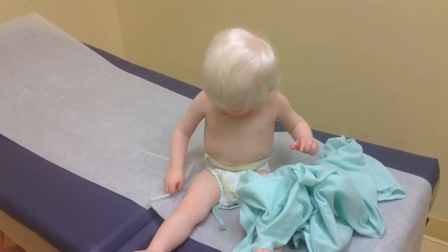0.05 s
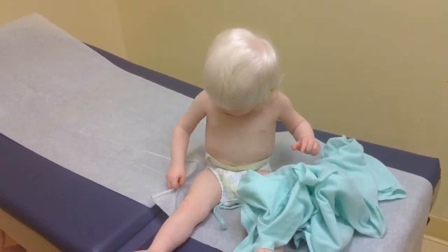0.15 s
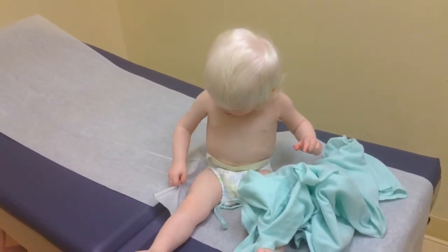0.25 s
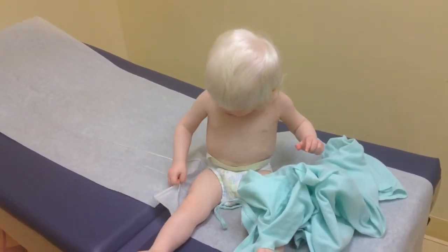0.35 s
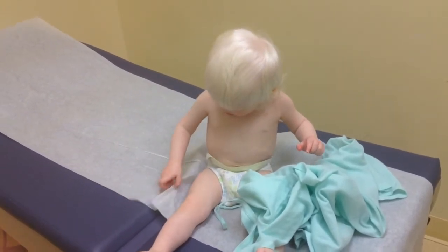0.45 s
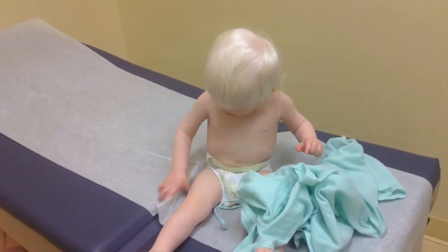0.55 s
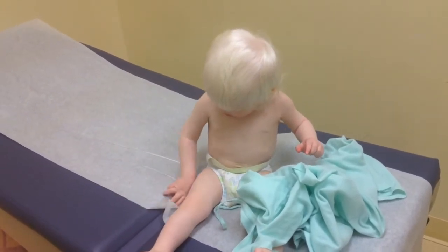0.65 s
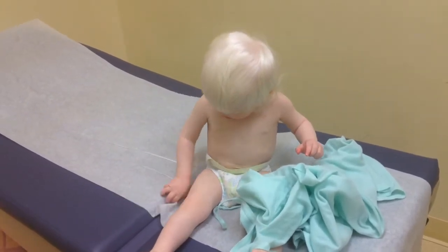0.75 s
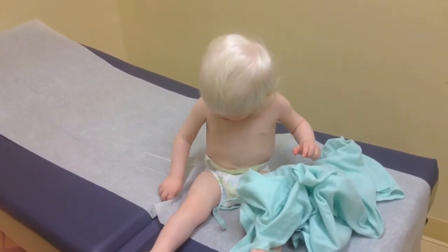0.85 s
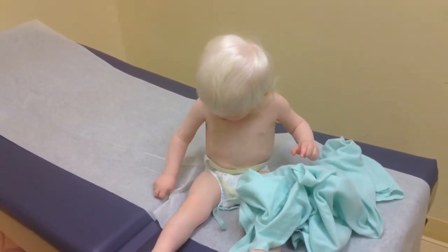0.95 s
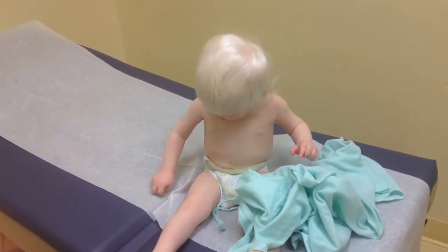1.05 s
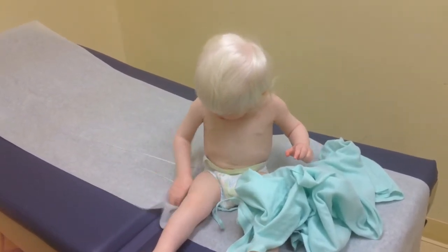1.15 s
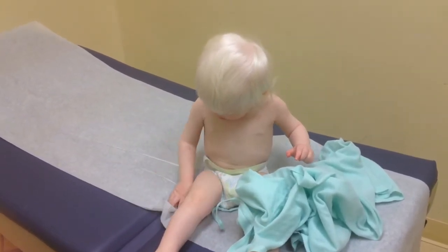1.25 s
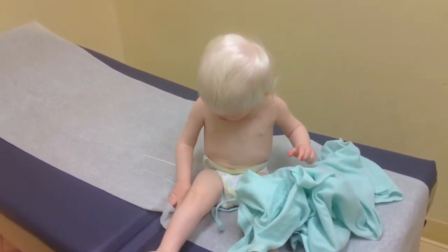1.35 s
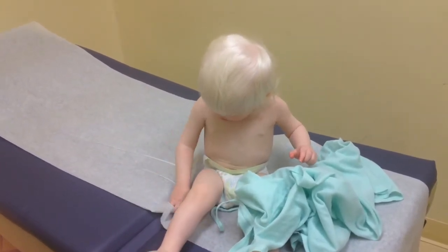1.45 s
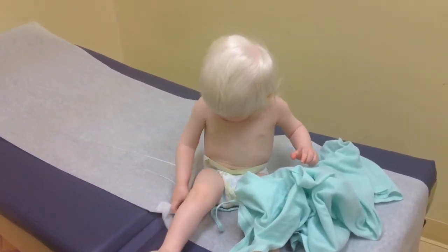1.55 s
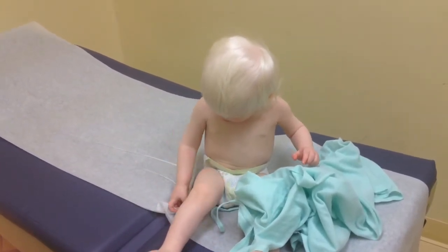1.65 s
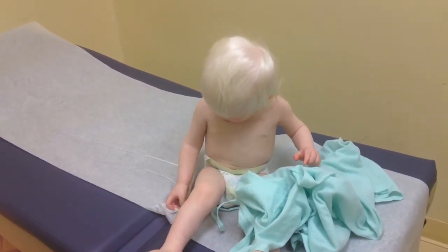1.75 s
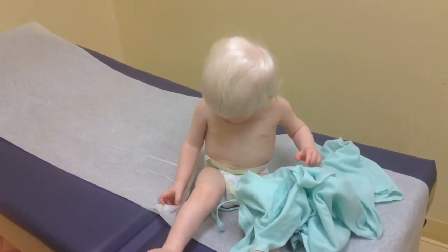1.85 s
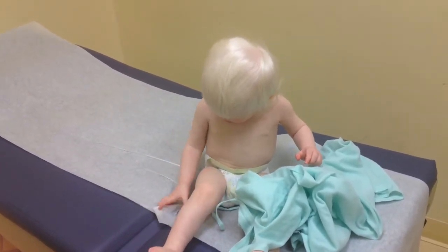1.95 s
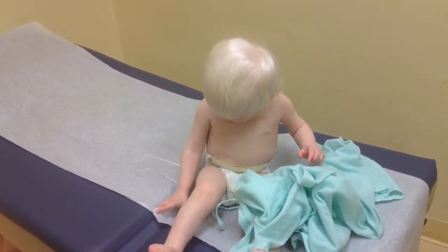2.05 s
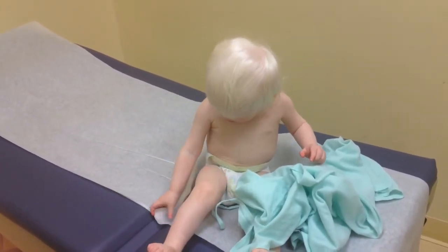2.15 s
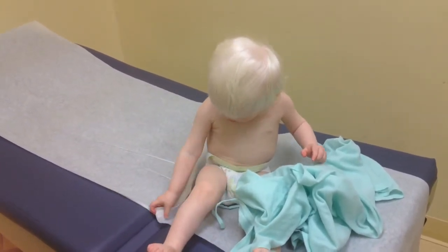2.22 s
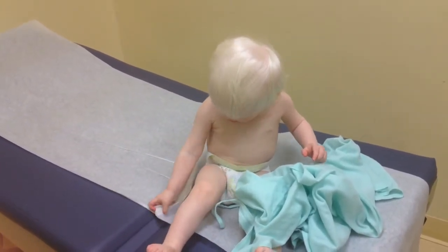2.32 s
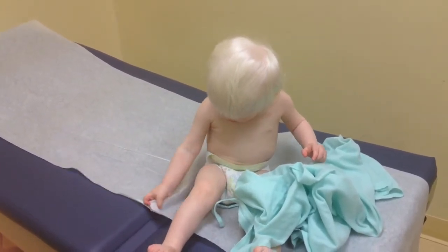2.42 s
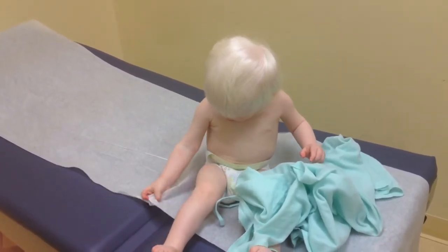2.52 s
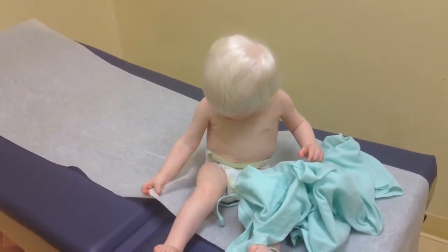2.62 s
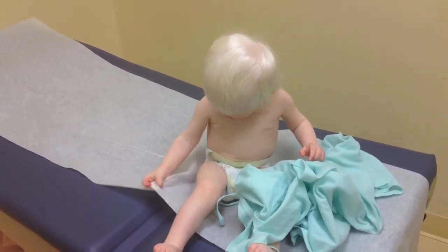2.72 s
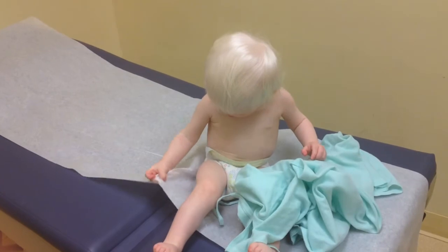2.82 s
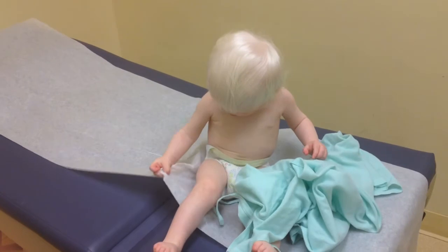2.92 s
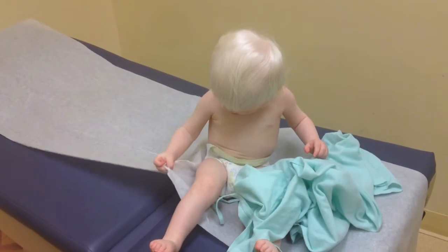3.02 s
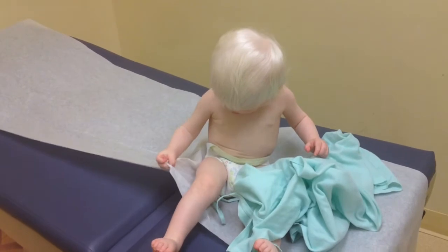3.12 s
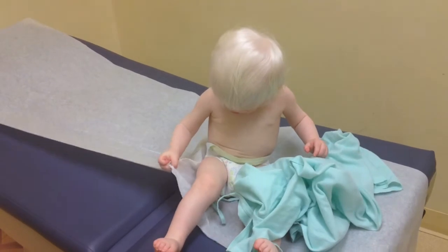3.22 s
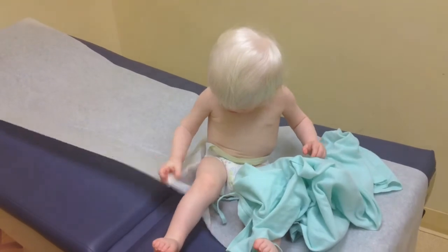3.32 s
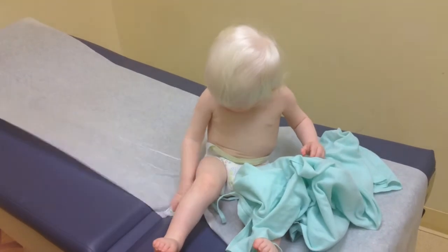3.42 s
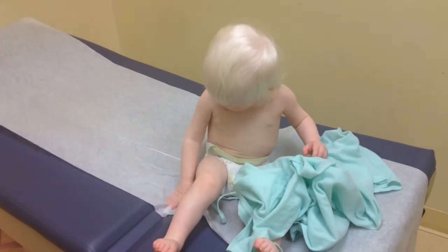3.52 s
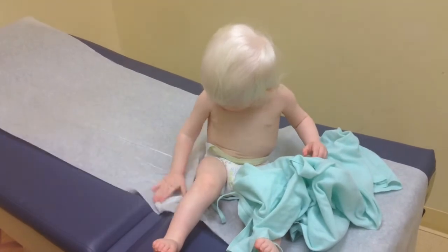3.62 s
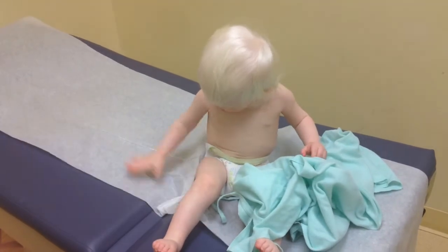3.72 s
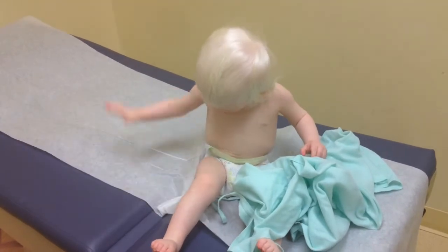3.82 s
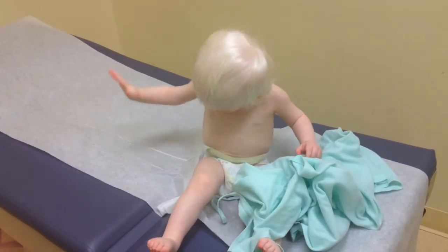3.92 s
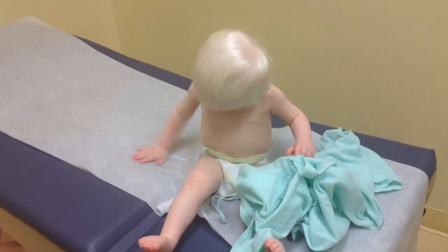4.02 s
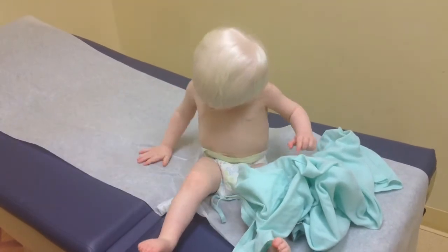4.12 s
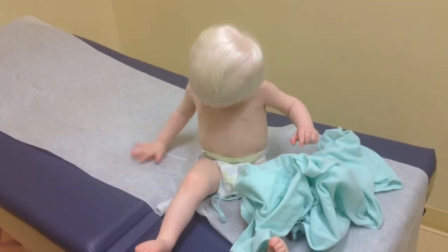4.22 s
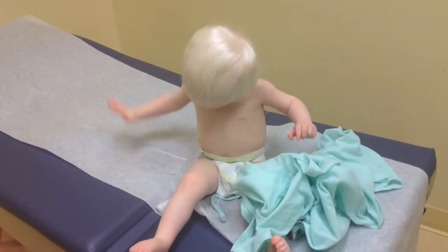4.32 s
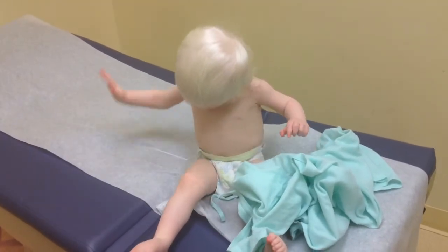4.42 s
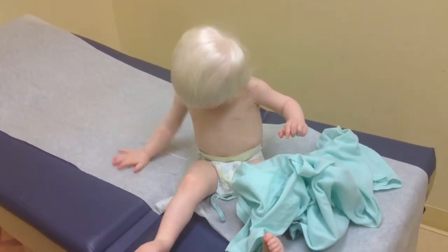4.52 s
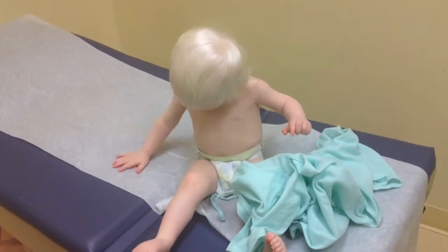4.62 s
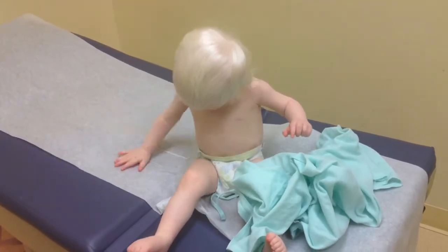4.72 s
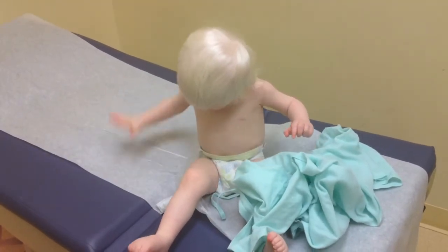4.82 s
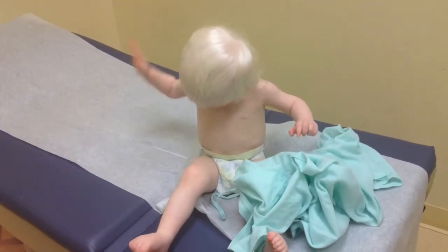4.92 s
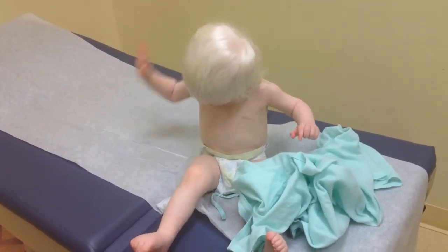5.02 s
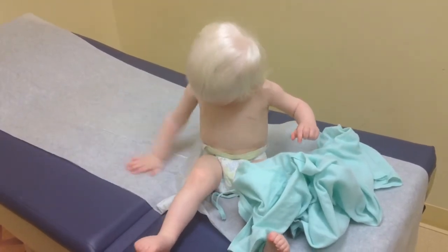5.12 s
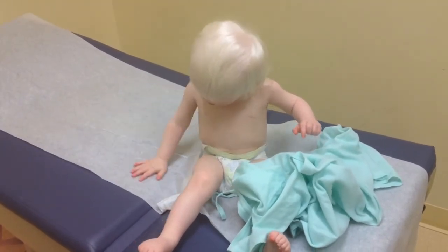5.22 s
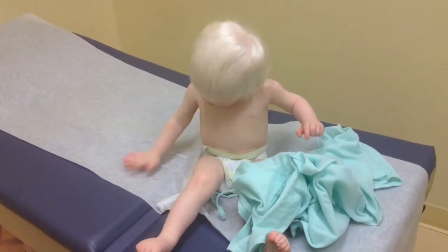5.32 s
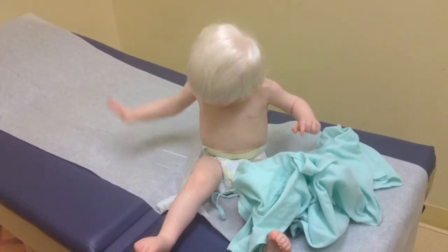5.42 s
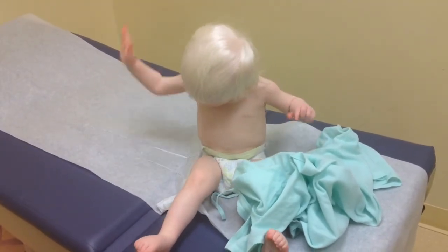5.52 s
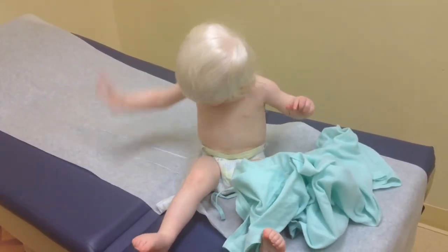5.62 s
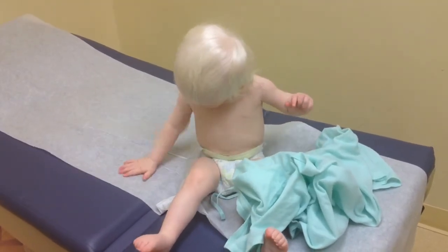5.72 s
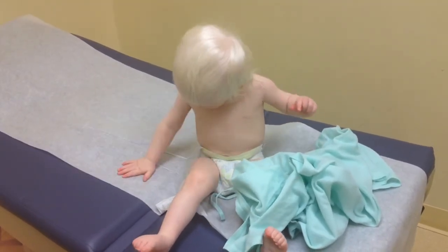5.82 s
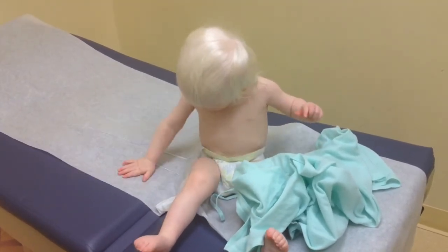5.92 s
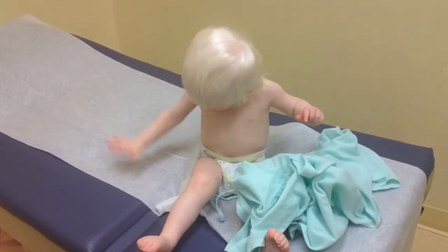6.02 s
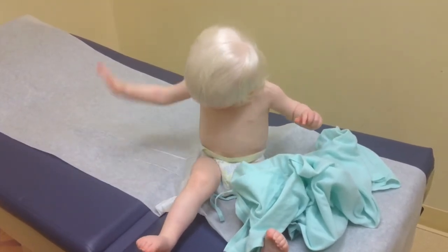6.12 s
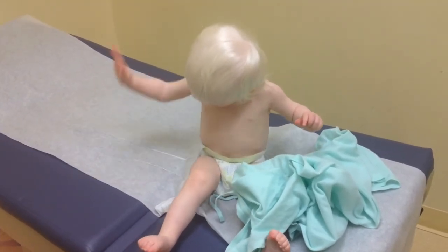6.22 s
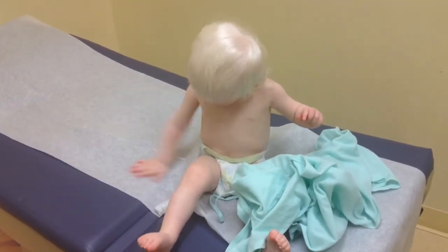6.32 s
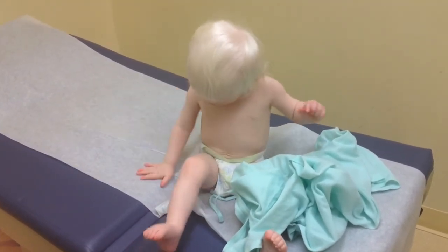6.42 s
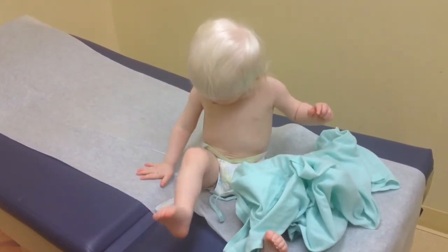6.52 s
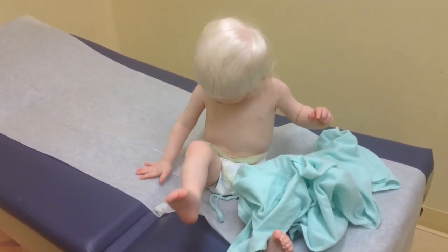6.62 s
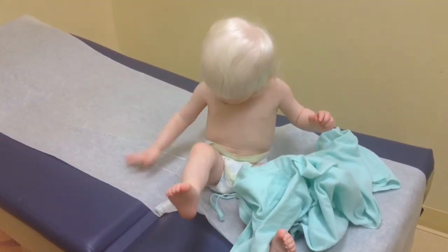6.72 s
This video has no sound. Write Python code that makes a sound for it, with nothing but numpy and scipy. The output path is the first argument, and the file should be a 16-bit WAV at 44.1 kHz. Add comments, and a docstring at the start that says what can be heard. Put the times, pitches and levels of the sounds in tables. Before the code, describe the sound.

Thin paper sheeting crunches and rustles in short uneven tugs, with small pauses and sharp ticks, ending in one strong snap as it is let go. Five separate hand slaps follow on the paper over a cushioned bench, bright on top and hollow underneath, with slight rustle between. A nearby microphone catches short room reflections and a low, steady air hum with little deep bass.

```python
"""In a small hard-walled room, small hands pull and scrunch a thin paper sheet on a padded bench,
then slap it five times. Ventilation, coloured noise through duct resonances, hums underneath.
Creases buckle as dense random clicks with louder snaps, all filtered by the sheet's resonances.
Each slap is a paper crack and a clap of trapped air over the ringing modes of pad and bench.
The room answers with a diffuse noise tail that dies at its own speed in each band."""
import sys
import numpy as np
from scipy import signal
from scipy.io import wavfile
from scipy.ndimage import uniform_filter1d

SR = 44100
rng = np.random.default_rng(int(sys.argv[2]) if len(sys.argv) > 2 else 0)


def transcribe(u):
    """Save the signal u as a 16-bit wav file named by the first command-line argument.

    u: samples, shape (n,) or (channels, n), limited to [-1, 1]; the rate is SR.
    q: integer samples, one column per channel.
    """
    v = np.clip(np.atleast_2d(u).T, -1, 1)
    q = np.round(v * 32767).astype(np.int16)
    wavfile.write(sys.argv[1], SR, q)


def field_ratio(decibels):
    """Amplitude ratio for a level in dB (20 dB per decade); scalars and array-likes work."""
    return 10 ** (np.asarray(decibels, dtype=float) / 20)


N = 298116  # length in samples


def evened(x):
    """Scales to rms 1."""
    return x / np.sqrt(np.mean(x ** 2) + 1e-20)


def peaked(x, db):
    """Scales so that the peak is that of a sine of rms level db."""
    return x * field_ratio(db) * np.sqrt(2) / abs(x).max()


def read(points, hz):
    """Reads a table on a log-frequency axis."""
    f, value = np.transpose(points)
    return np.interp(np.log(hz + 1), np.log(f + 1), value)


def bumps_db(modes, hz):
    """Bell-shaped boosts of a spectrum, one per resonance."""
    return sum(db / (1 + (2 * (hz - f) / width) ** 2) for f, width, db in modes)


def colour(x, db):
    """Minimum-phase filter shaped by db on a 4096-point FFT grid, scaled to unit tap energy."""
    log_gain = np.log(field_ratio(np.maximum(db, -100)))
    full = np.concatenate([log_gain, log_gain[-2:0:-1]])
    taps = np.fft.ifft(np.exp(np.conj(signal.hilbert(full)))).real[:2048]
    return signal.oaconvolve(x, taps / np.linalg.norm(taps))[:len(x)]


def band(x, lo_hz, hi_hz):
    """Band-pass, its upper edge kept below half the sample rate."""
    edges = [lo_hz, min(hi_hz, SR / 2.1)]
    return signal.sosfilt(signal.butter(2, edges, "bandpass", fs=SR, output="sos"), x)


def add(mix, s, sound):
    """Mixes a sound in at time s, cut off at the end of the mix."""
    part = mix[round(s * SR):][:len(sound)]
    part += sound[:len(part)]


# spectrum of the moving air: (f/Hz, relative level/dB)
AIR_SPECTRUM = [(30, -50), (85, -36), (105, -21), (165, -8), (370, -8), (430, -17.5), (700, -17.5),
                (1300, -21.5), (3000, -26), (5000, -28), (8000, -34.5), (11000, -38.5), (15800, -34)]
# duct and room resonances in the hum: (f/Hz, width/Hz, boost/dB)
DUCT_MODES = [(110.3, 8.2, 13.5), (169, 11.5, 12), (251.7, 41, 12), (342.2, 19, 12.5), (882.7, 10, 11),
              (977, 18, 14), (2196, 160, 10)]
AIR_DB = -57.5  # rms level of the whole hum


def ventilation():
    """Steady air noise through duct resonances, wavering in patches of time and frequency."""
    frames, hz = N // 512 + 5, np.fft.rfftfreq(2048, 1 / SR)
    real, imag, patches = rng.standard_normal((frames, len(hz), 3)).T
    patches = uniform_filter1d(patches, size=6, axis=0)
    patches = evened(uniform_filter1d(patches, size=5, axis=1))
    spectrum_db = read(AIR_SPECTRUM, hz) + bumps_db(DUCT_MODES, hz)
    z = (real + 1j * imag) * field_ratio(spectrum_db[:, None] + 1.3 * patches)
    hum = signal.istft(z, nperseg=2048, noverlap=1536)[1][:N]
    return field_ratio(AIR_DB) * evened(hum)


# decay of the small hard room: (f/Hz, t60/s)
ROOM_DECAY = [(80, 0.15), (210, 0.46), (560, 0.071), (1470, 0.24), (3880, 0.22), (10200, 0.13)]


def room(x):
    """Diffuse tail: the power in each band lingers and dies at its own speed, with random phases."""
    hz, t, z = signal.stft(x, SR, nperseg=256, noverlap=192)
    power = uniform_filter1d(abs(z) ** 2, size=3, axis=0)
    keep = field_ratio(-120 * (t[1] - t[0]) / read(ROOM_DECAY, hz))  # share of the power left per frame
    # the tail starts four frames (about 6 ms) after the direct sound
    tail = np.array([signal.lfilter([0, 0, 0, 0, 1 - r], [1, -r], row) for r, row in zip(keep, power)])
    real, imag = rng.standard_normal((len(t), len(hz), 2)).T
    z = np.sqrt(tail) * (real + 1j * imag)
    return np.sqrt(2) * signal.istft(z, SR, nperseg=256, noverlap=192)[1][:N]


# spectrum of the sheet: (f/Hz, relative level/dB)
PAPER_SPECTRUM = [(300, -2.5), (600, -14), (1000, -2.5), (1500, -5.5), (3300, -10), (5500, -10.5),
                  (8000, -1.5), (10500, -15), (13000, -18), (15500, -19.5)]
# resonances of the sheet: (f/Hz, width/Hz, boost/dB)
PAPER_MODES = [(2154, 254, 7), (4696, 630, 7), (6290, 1400, 4), (12400, 2200, 2)]


def paper(low, body, crisp):
    """The three ranges of the sheet's sound, through its resonances."""
    drive = band(low, 454, 1097) + band(body, 890, 9575) + band(crisp, 8230, 19160)
    hz = np.fft.rfftfreq(4096, 1 / SR)
    return colour(drive, read(PAPER_SPECTRUM, hz) + bumps_db(PAPER_MODES, hz))


def crackle(count, per_s, spread_db):
    """Buckling creases: clicks of random sign, a few much larger than the rest, at rms 1."""
    size = field_ratio(spread_db * np.minimum(rng.exponential(1, count), 3.8))
    struck = rng.random(count) < per_s / SR
    return evened(size * rng.standard_normal(count) * struck)


# pulls and shifts of the sheet, levels driving the paper filter:
# (full strength at t/s, hold/s, crackle level/dB, build-up/dB per s, low flap level/dB before its lift)
PULLS = [(0.01, 0.013, -42.5, 207, -52.5), (0.088, 0.022, -42.5, 120, -55),
         (0.221, .005, -44.5, 230, -54.5), (0.28, 0.086, -50, 196, -56.5), (0.437, 0.023, -47.5, 2500, -65),
         (0.45, 0.0085, -43.5, 202, -52), (0.535, 0.028, -40.5, 200, -50), (0.645, 0.023, -42, 67, -47.5),
         (0.684, 0.011, -42.5, 117, -61), (0.812, 0.046, -41, 60, -48), (0.98, .005, -54, 150, -69),
         (1.134, 0.044, -48.5, 2507, -60), (1.163, 0.025, -41, 800, -51.5), (1.24, 0.014, -45, 120, -60),
         (1.278, 0.061, -52, 100, -51), (1.434, 0.027, -43.5, 1500, -47.5), (1.537, .1, -41.5, 98, -50),
         (1.889, 0.015, -47.5, 55, -56), (2.027, .03, -53, 900, -64), (2.05, 0.041, -45.5, 300, -47.5),
         (2.156, 0.046, -43.5, 67, -52.5), (2.29, .02, -53, 120, -66), (2.391, .04, -49.5, 250, -58),
         (2.463, 0.04, -37.5, 700, -50), (2.673, 0.057, -56.5, 100, -82.5), (2.75, 0.0082, -49.5, 66, -54),
         (2.893, 0.2, -44.5, 59, -51.5), (3.23, 0.021, -69, 400, -56.5), (3.262, .08, -55, 1497.5, -72),
         (3.358, 0.1, -39, 298, -57), (3.461, 0.018, -36.5, 67, -42.5), (3.545, 0.16, -43, 300, -52.5),
         (3.846, .2, -68, 100, -69), (4.236, 0.032, -53.5, 300, -66), (4.33, 0.058, -48.5, 150, -56.5),
         (4.452, 0.048, -51, 98, -60.5), (4.725, 0.058, -62.5, 100, -72), (5.104, 0.0046, -59.5, 101, -78),
         (5.559, .005, -60, 900, -85), (5.627, .01, -67, 500, -85), (5.9, .01, -62.5, 98, -85),
         (6.039, .005, -58, 900, -87), (6.164, .19, -63, 900, -75), (6.677, .01, -60, 134, -76)]
SAG_DB_PER_S, RELEASE_DB_PER_S = 18.5, 211  # the grip tires while it holds, then lets go


def effort(t):
    """Each pull builds up, holds and lets go; returns the crackle and flap levels in dB."""
    power = np.full((2, len(t)), 1e-9)
    for s, hold, crackle_db, build, flap_db in PULLS:
        since = t - s
        sag_db = SAG_DB_PER_S * np.minimum(since, hold)
        release_db = RELEASE_DB_PER_S * np.maximum(since - hold, 0)
        shape_db = np.where(since < 0, build * since, -sag_db - release_db)
        power += field_ratio(2 * (shape_db + np.array([[crackle_db], [flap_db]])))
    return 10 * np.log10(power)


# edges of the ranges in which creases of different sizes ring: (f/Hz)
CREASE_EDGES = [350, 1200, 2800, 4000, 6500, 9000, 12000, 18000]
CRISP_DB, CRISP_DB_PER_DB = 2, 0.02  # treble at a firm pull, and its gain with effort
FIRM_DB = -45  # crackle level of a firm pull
FLAP_LIFT_DB = 8.5


def handling():
    """Creases of every size buckle, each ringing in its own range; long folds click in all ranges."""
    steps = np.arange(0, N + 64, 64)
    level_db, flap_db = (np.interp(np.arange(N), steps, row) for row in effort(steps / SR))
    crisp_db = CRISP_DB + CRISP_DB_PER_DB * (level_db - FIRM_DB)  # firmer pulls sound crisper
    clicks = 0.48 * crackle(N, per_s=1200, spread_db=2.5)  # long folds
    for lo_hz, hi_hz in zip(CREASE_EDGES, CREASE_EDGES[1:]):
        # slow noise swells and thins the clicks of each range on its own
        clumps = uniform_filter1d(rng.standard_normal(N), size=400)
        clumps = evened(uniform_filter1d(clumps, size=300))
        clicks += band(crackle(N, per_s=700, spread_db=3.8) * field_ratio(2.2 * clumps), lo_hz, hi_hz)
    clicks = evened(clicks)
    low = clicks * field_ratio(flap_db + FLAP_LIFT_DB)
    body = clicks * field_ratio(level_db)
    crisp = clicks * field_ratio(level_db + crisp_db)
    return low, body, crisp


# creases that snap: (t/s, relative level/dB, ring f/Hz)
SNAPS = [(0.0688, -39, 4200), (0.2324, -37.5, 3070), (0.4284, -37, 2160), (0.5506, -35.5, 2280),
         (0.9912, -47, 4760), (1.1268, -46, 7000), (1.2385, -37, 7000), (1.161, -32, 2110),
         (1.3608, -40.5, 4800), (1.7852, -43.5, 4260), (2.0176, -44, 9000), (2.2702, -39.5, 4730),
         (2.2917, -34, 6850), (2.38, -49, 1890), (2.3974, -40.5, 2200), (2.469, -34, 2090),
         (2.6334, -52, 2140), (2.6535, -41, 4600), (2.669, -42.5, 4650), (2.7134, -39, 2180),
         (2.7735, -32.5, 7300), (2.8419, -49, 2190), (2.8834, -37, 2000), (2.9495, -38.5, 5130),
         (3.021, -38.5, 2430), (3.2155, -64, 2300), (3.255, -63, 2000), (3.46, -24.5, 1650),
         (3.7393, -36.5, 5340), (3.913, -47.5, 2250), (4.25, -50, 4970), (4.295, -39, 1960),
         (4.7832, -51, 4420), (4.8816, -49, 1000), (5.559, -55, 2330), (6.052, -50, 4560),
         (6.3205, -54, 2230)]


def snaps():
    """Each snap is a tick near its own pitch, with a short spray of smaller ones behind it."""
    out, t = np.zeros(N), np.arange(1500) / SR
    for s, db, hz in SNAPS:
        decay = field_ratio(-60 * t / 0.011) + 0.17 * field_ratio(-60 * t / 0.14)  # tick and spray, t60 in s
        burst = rng.standard_normal(len(t)) * decay
        pitched = band(burst, 0.58 * hz, 2.55 * hz)
        add(out, s, field_ratio(db - 0.5) * (0.89 * pitched + 0.57 * burst))
    return out


# slaps: (t/s, crack drive level/dB, bench boom level/dB, pad thump level/dB, landing time constant/ms)
SLAPS = [(4.0660, -14, -40, -32, 5.7), (4.553, -13.5, -35, -29.5, 2.9), (5.1730, -14.5, -33, -27.5, 0.99),
         (5.7257, -18.5, -33.5, -25.5, 3.8), (6.3676, -18.5, -48, -34.5, 2.1)]
# bench and room modes: (f/Hz, relative level/dB, t60/s)
PAD_MODES = [(112.4, -9.5, 0.45), (161, 0, 0.29), (186.5, 3, 0.37), (219.1, 4, 0.3), (274.2, 0, 0.21),
             (328, -2.5, 0.3), (380.7, -13, 0.29), (451, -1, 0.12), (567, -14.5, 0.36)]
SETTLE_MS, SETTLE_PER_LANDING = 1, 1.26  # a slow landing settles slowly
CLAP_DB, CLAP_DB_PER_MS = -23.5, -2.5  # a sudden landing traps more air
# a firmer thump flattens the palm and lifts the clap from its pitch at a thump of CLAP_AT_DB
CLAP_HZ, CLAP_OCT_PER_DB, CLAP_AT_DB = 735, 0.1, -29


def slaps():
    """Fingers and palm land over a few ms: the paper cracks, trapped air claps, pad and bench boom."""
    crack, boom = np.zeros((2, N))
    t = np.arange(SR // 2) / SR
    for s, crack_db, boom_db, thump_db, land_ms in SLAPS:
        settle_ms = SETTLE_MS + SETTLE_PER_LANDING * land_ms
        shape = (1 - np.exp(-1000 * t / land_ms)) * np.exp(-1000 * t / settle_ms)
        rustle = 0.083 * field_ratio(-60 * t / 0.31)  # crackle dying away behind the crack
        clicks = crackle(len(t), per_s=15000, spread_db=2.5)
        add(crack, s, field_ratio(crack_db) * clicks * (shape + rustle))

        # the hand lands at a new spot each time, so the modes start with other strengths and phases
        strength_db = 2.5 * rng.standard_normal(len(PAD_MODES))
        phase = 0.6 * rng.standard_normal(len(PAD_MODES))
        ring = np.zeros(len(t))
        for (hz, db, t60), more_db, turn in zip(PAD_MODES, strength_db, phase):
            ring += field_ratio(db + more_db - 60 * t / t60) * np.sin(2 * np.pi * hz * t + turn)
        ring *= 1 - np.exp(-t / 0.0009)  # soft onset
        add(boom, s, peaked(band(ring, 97, 171), boom_db))
        add(boom, s, peaked(band(ring, 278, 636), thump_db))

        clap_hz = CLAP_HZ * 2 ** (CLAP_OCT_PER_DB * (thump_db - CLAP_AT_DB))
        breath = band(rng.standard_normal(len(t)), 0.94 * clap_hz, 1.68 * clap_hz)
        puff = shape * (np.sin(2 * np.pi * clap_hz * t) + 1.4 * breath)
        add(boom, s, peaked(puff, CLAP_DB + CLAP_DB_PER_MS * land_ms))
    crack = 0.72 * crack + 0.77 * band(crack, 3820, 7660)  # flattened paper cracks brighter than it rustles
    return crack * field_ratio([[-8.0], [0], [5.0]]), boom  # crack drives the low, body and crisp ranges


def scene():
    """Paper and slaps, direct and through the room, over the hum."""
    crack, boom = slaps()
    sheet = field_ratio(-2.0) * paper(*(np.array(handling()) + crack))
    snap = snaps()
    ticks = paper(snap, snap, snap)
    to_room = sheet + 0.96 * ticks + 0.57 * band(boom, 270, 3000)
    mix = sheet + ticks + boom + field_ratio(2.5) * room(to_room) + ventilation()
    return mix[None]


def band_limit(x):
    """A steep low-pass at the top of the band."""
    return signal.sosfilt(signal.butter(12, 16440, fs=SR, output="sos"), x)


def record(dry):
    """The microphone drops the lowest bass and the top."""
    cut = signal.sosfilt(signal.butter(8, 95.0, "highpass", fs=SR, output="sos"), dry)
    lowpass = signal.firwin(255, 15550, window=("kaiser", 8), fs=SR)
    cut = signal.oaconvolve(cut, lowpass[None], "same")
    return band_limit(cut)


dry = scene()
out = record(dry)
transcribe(out)
```